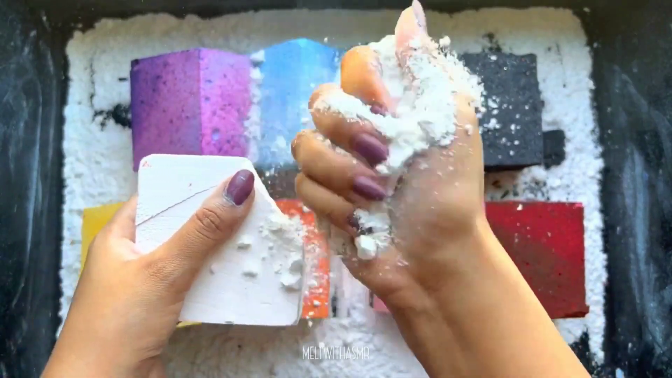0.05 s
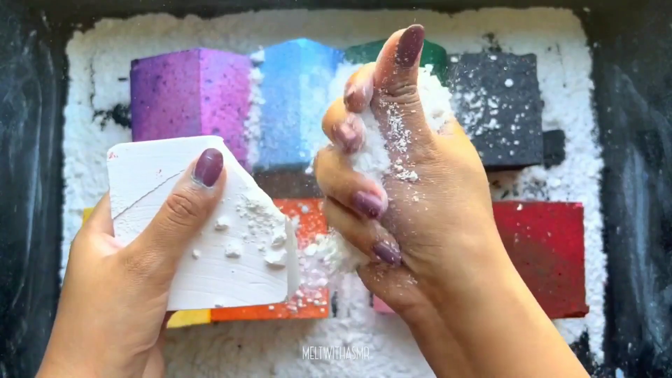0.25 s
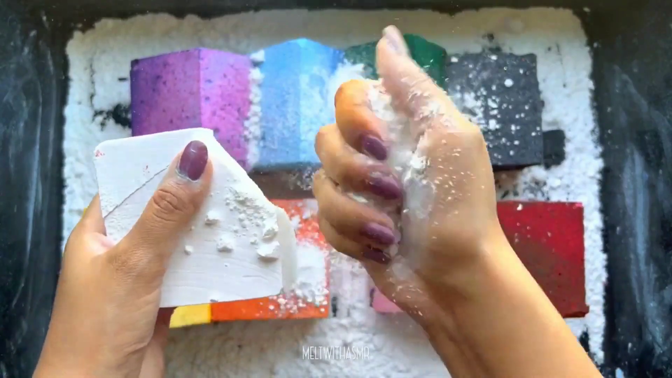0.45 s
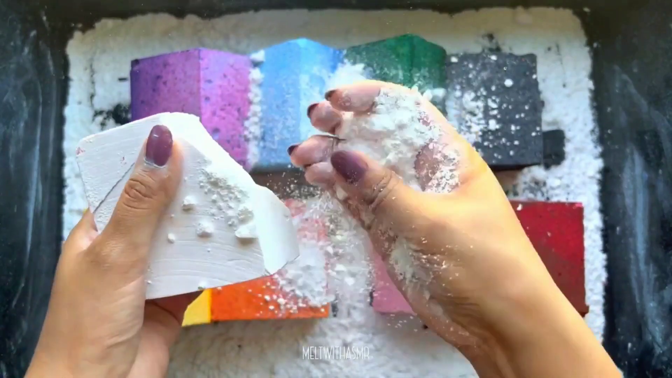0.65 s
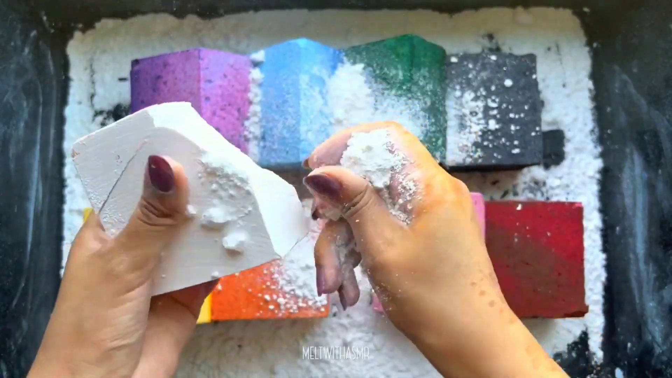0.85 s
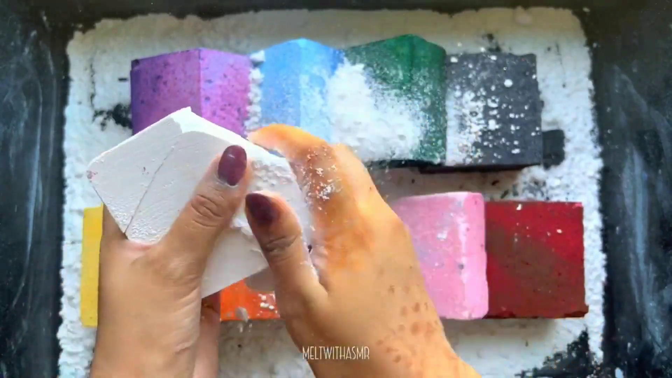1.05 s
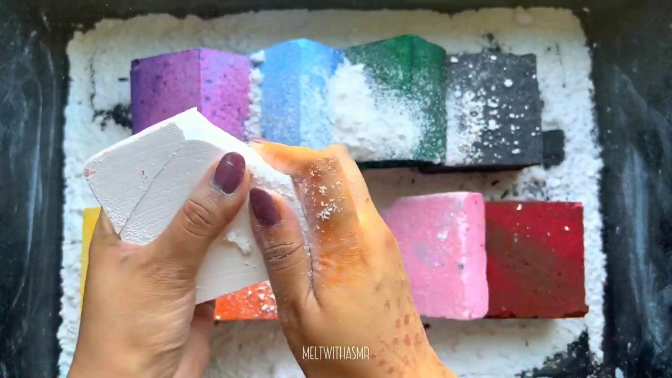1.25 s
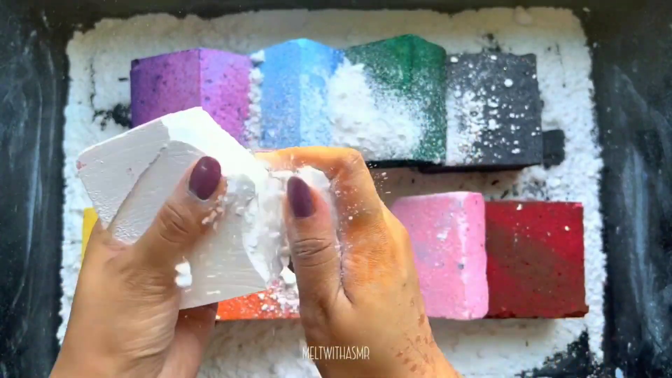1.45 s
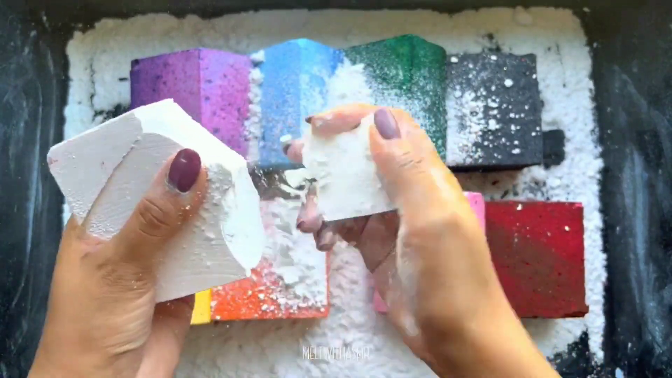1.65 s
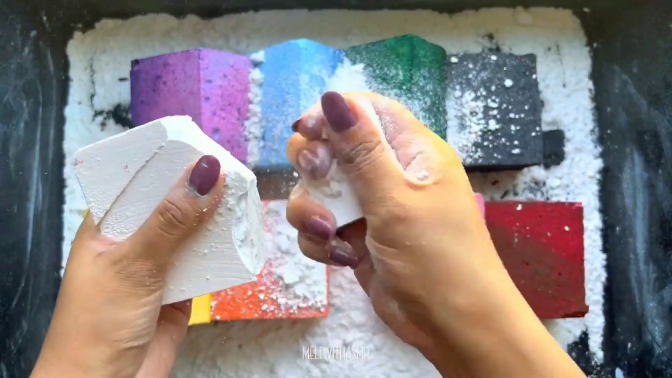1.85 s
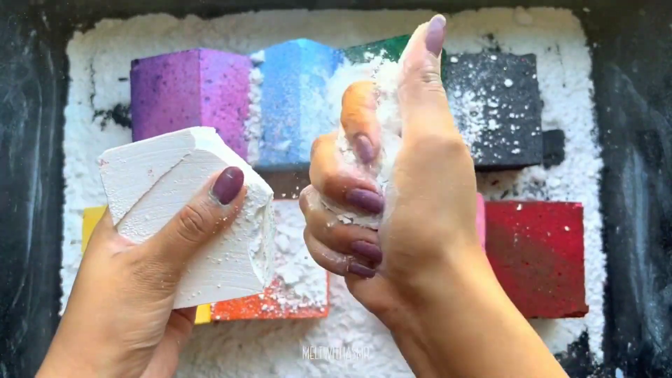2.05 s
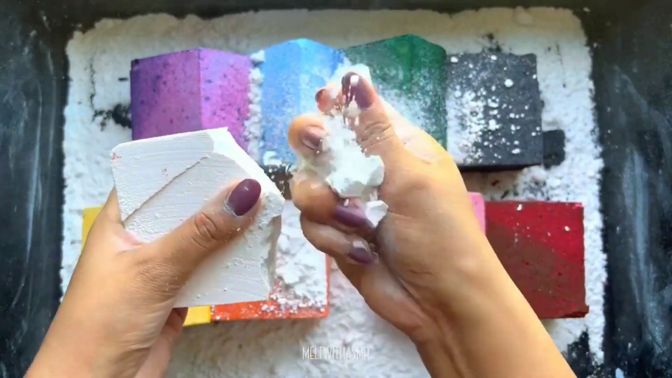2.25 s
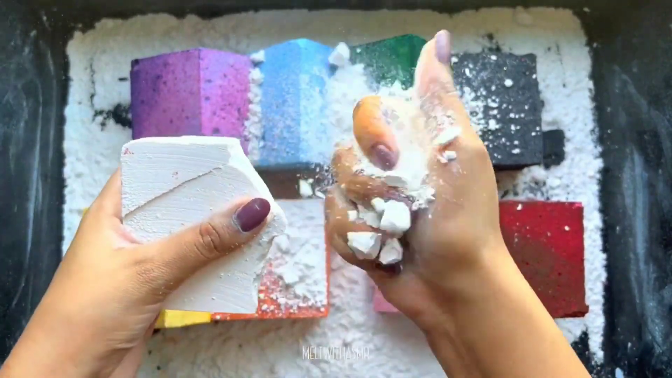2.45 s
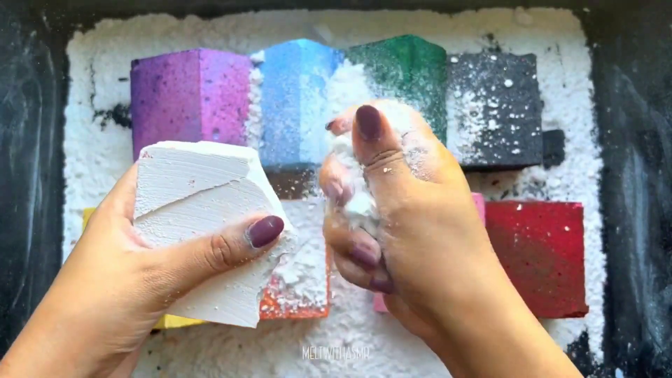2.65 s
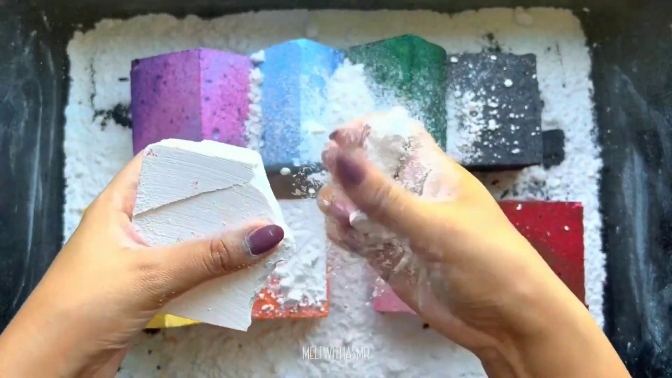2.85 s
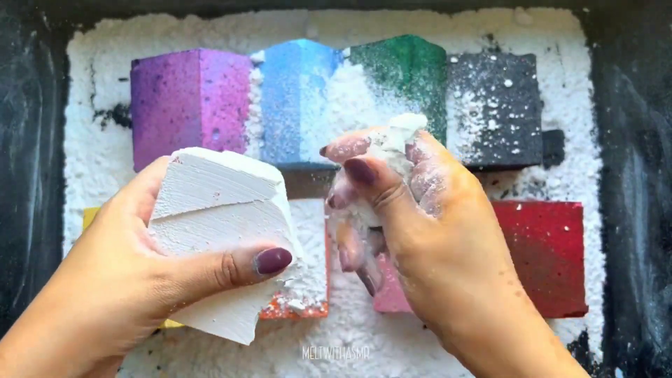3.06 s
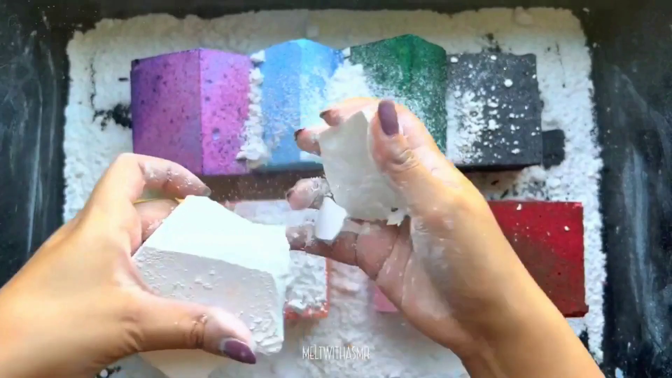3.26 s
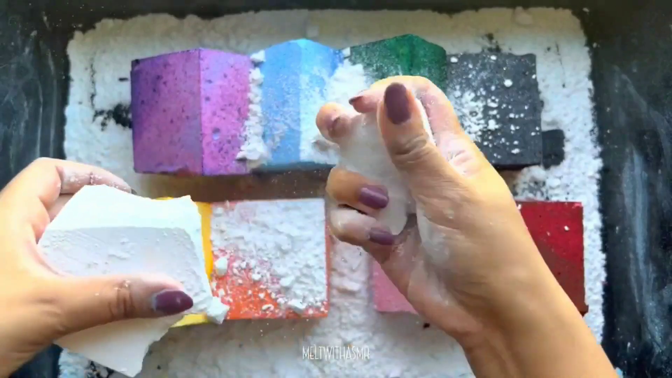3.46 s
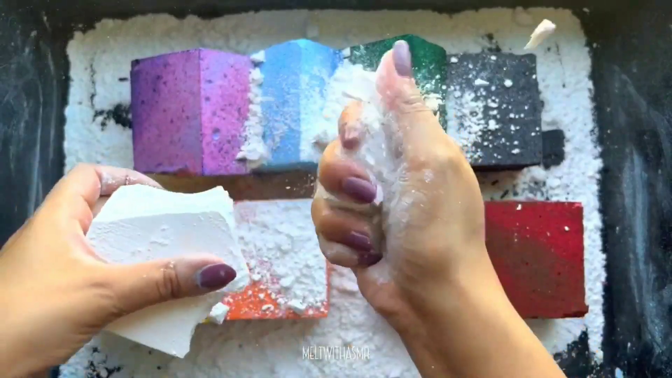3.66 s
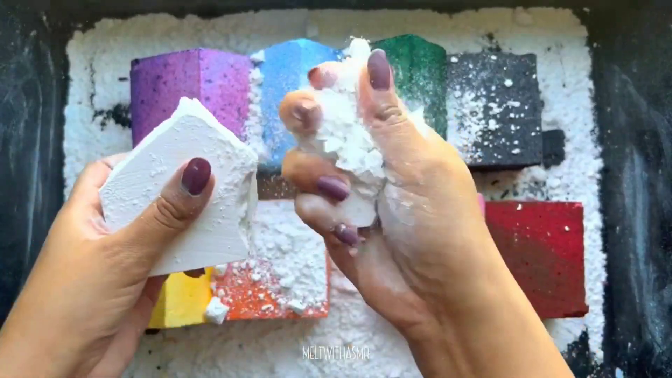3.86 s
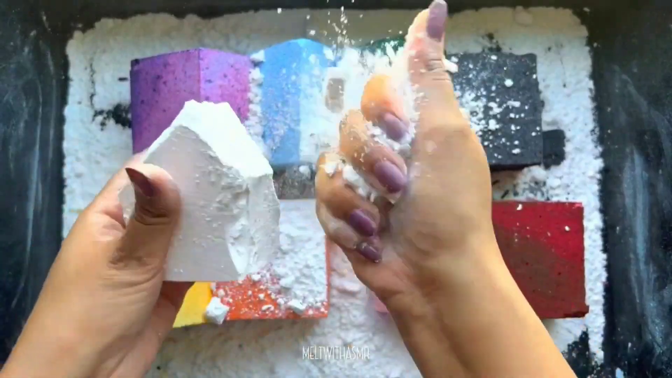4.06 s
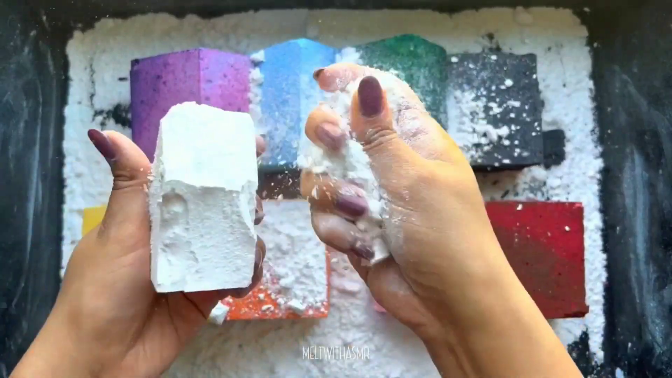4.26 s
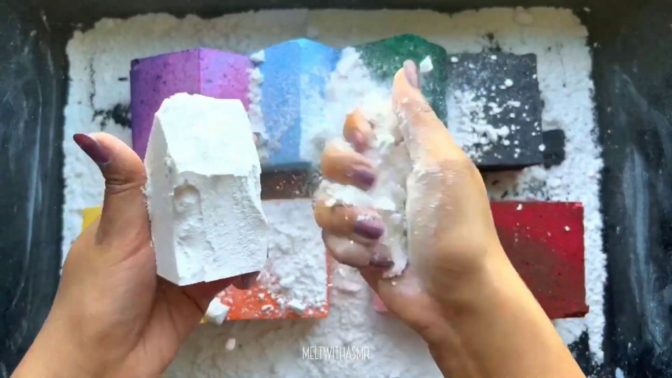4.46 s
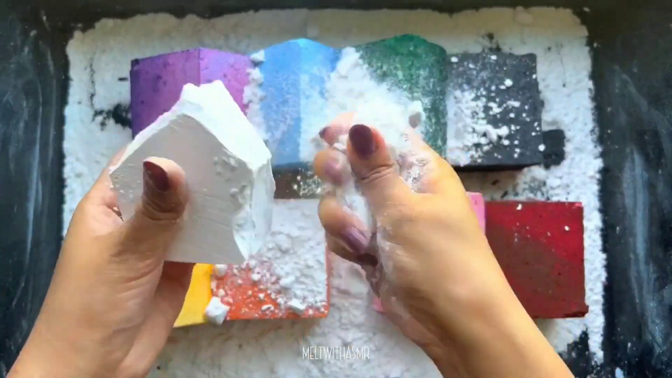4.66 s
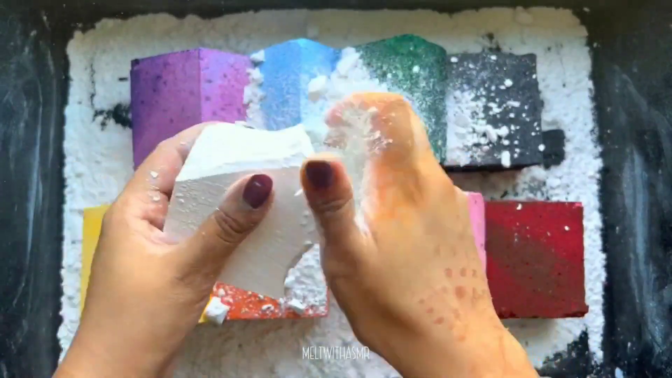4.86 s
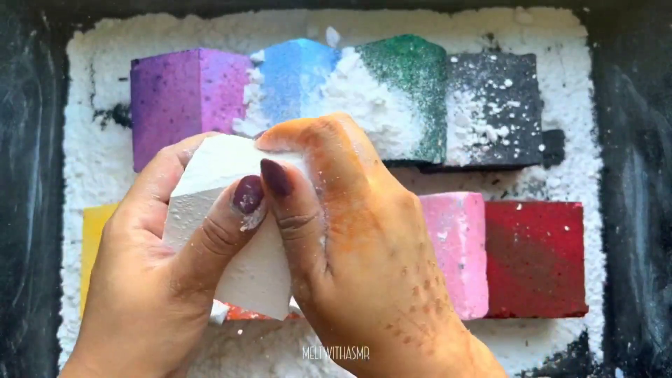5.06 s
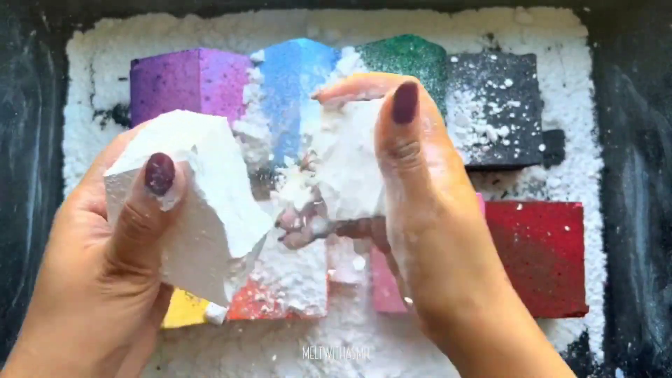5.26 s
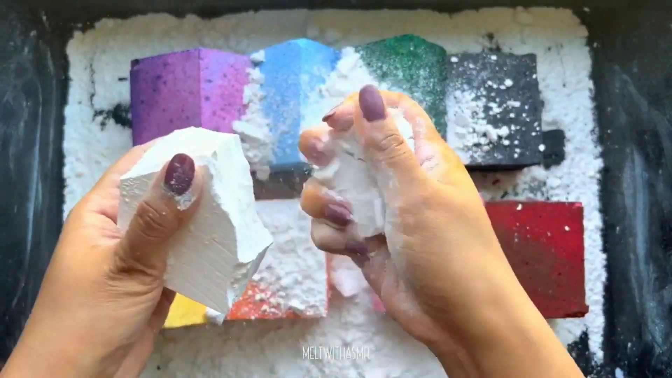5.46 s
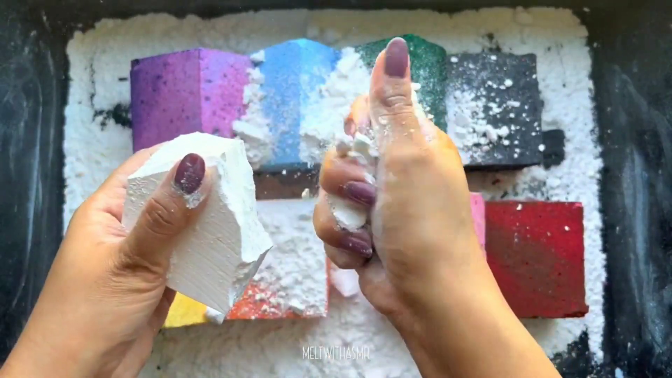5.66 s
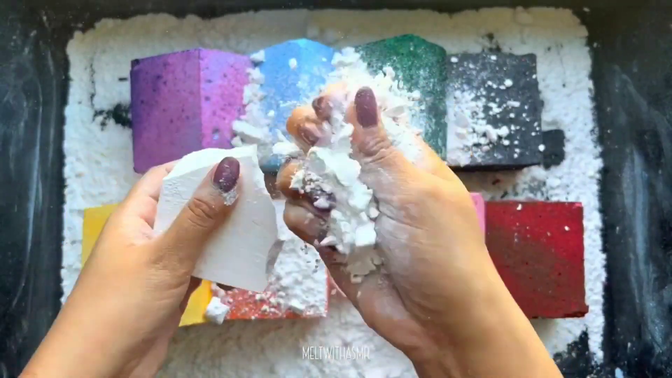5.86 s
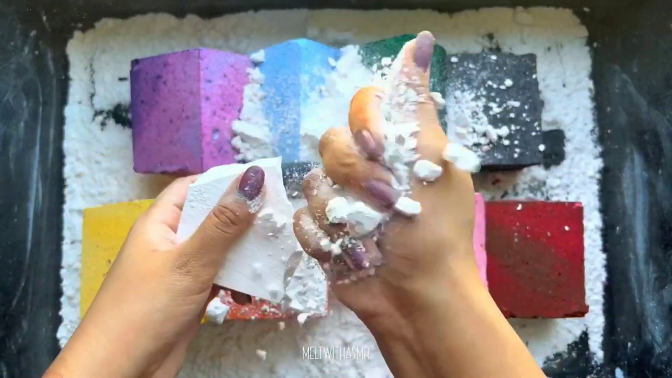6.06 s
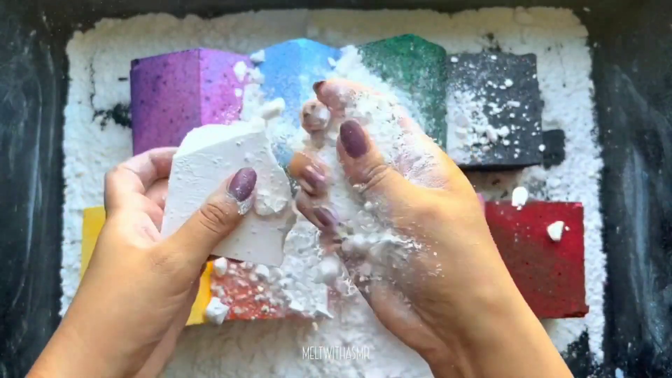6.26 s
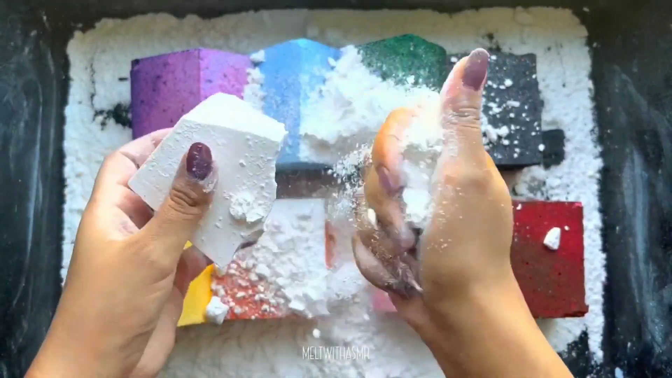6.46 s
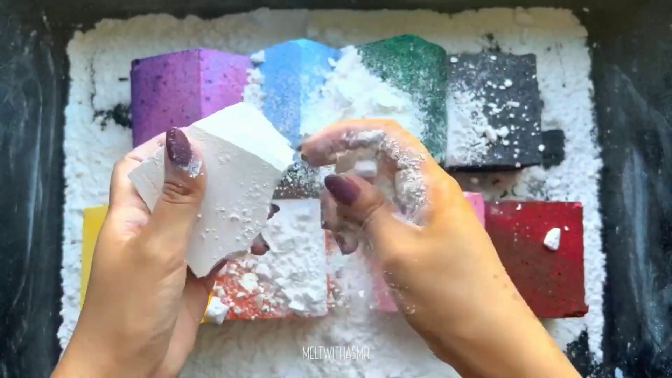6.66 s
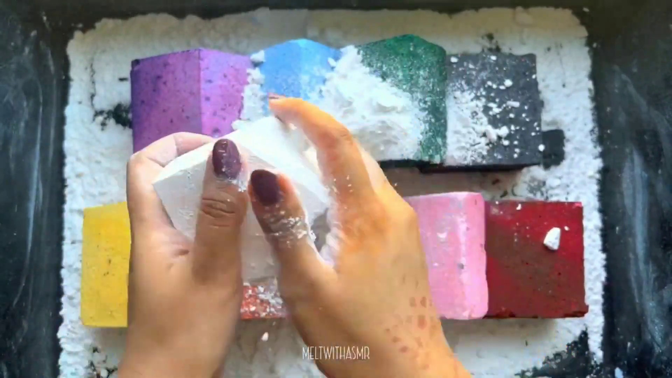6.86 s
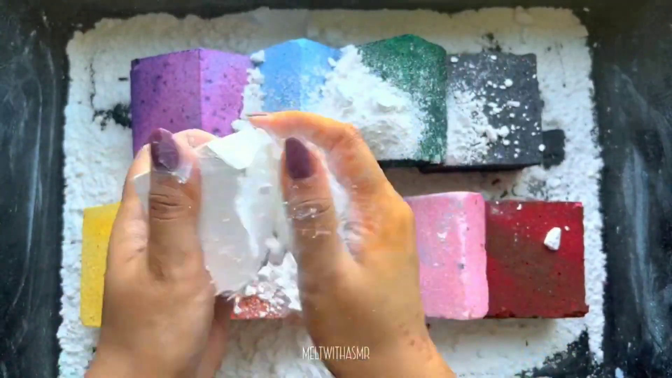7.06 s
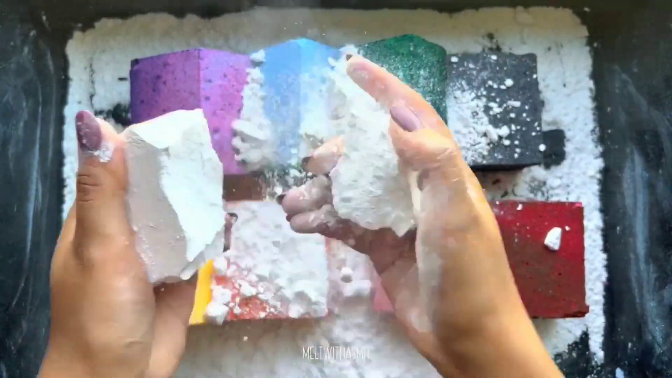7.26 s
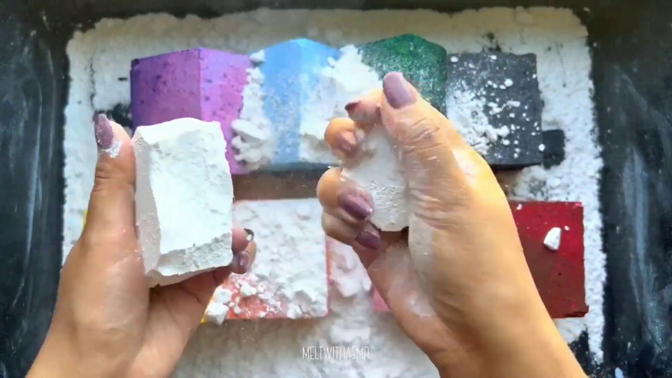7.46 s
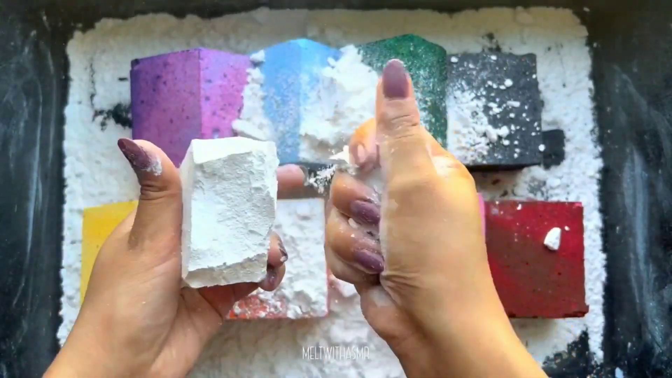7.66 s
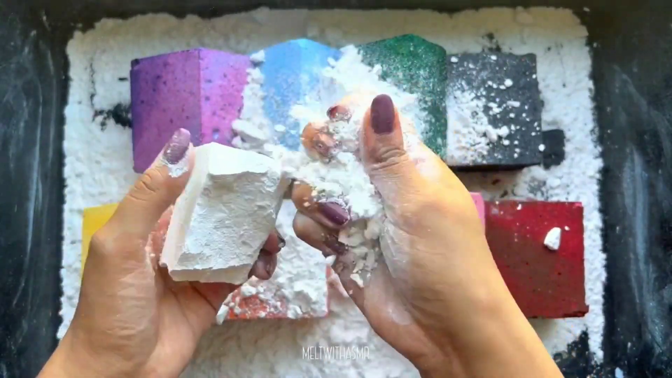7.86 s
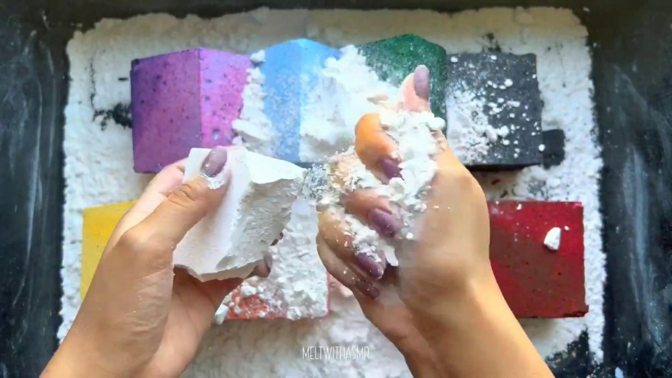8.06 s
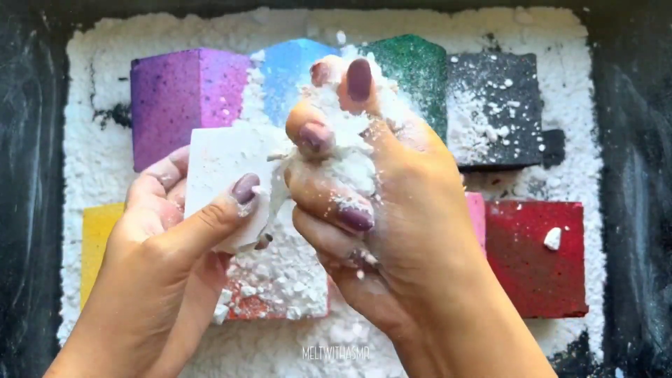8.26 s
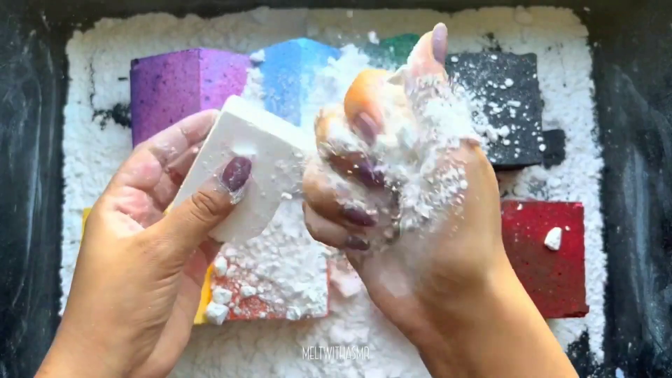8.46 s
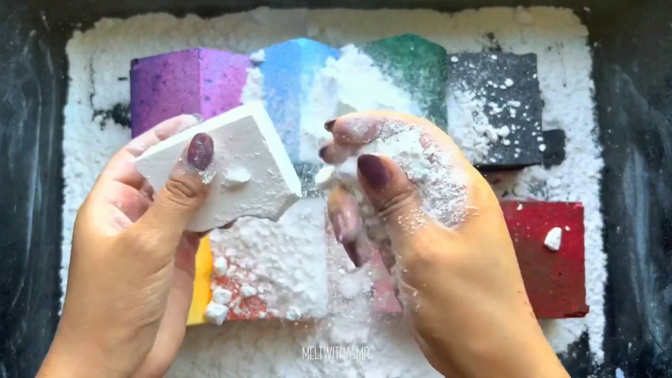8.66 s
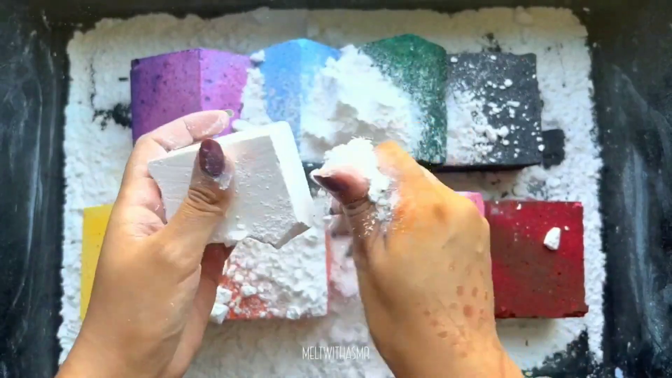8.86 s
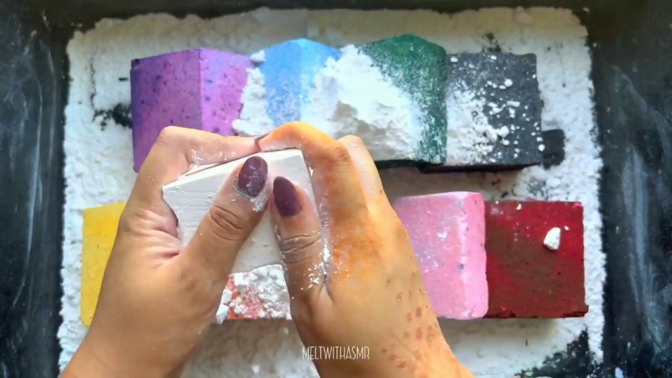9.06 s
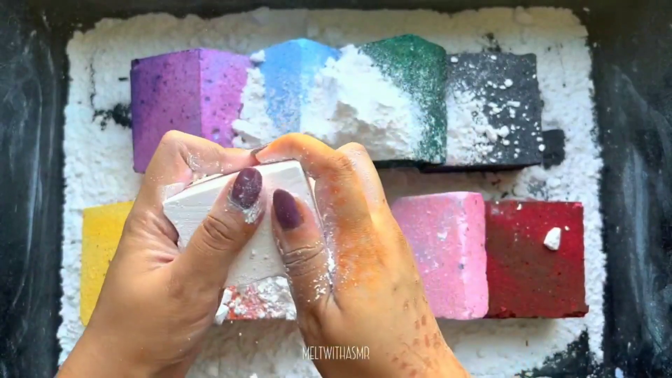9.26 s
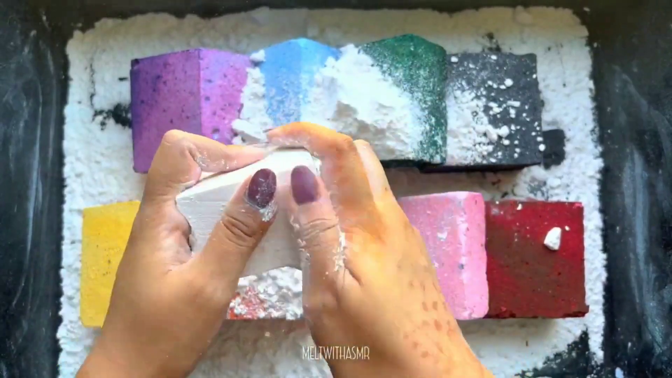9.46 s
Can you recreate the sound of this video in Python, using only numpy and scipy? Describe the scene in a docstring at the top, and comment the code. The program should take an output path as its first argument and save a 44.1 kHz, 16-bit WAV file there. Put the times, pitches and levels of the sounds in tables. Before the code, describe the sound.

Blocks of chalk are broken and ground to powder in a fist, heard close and dry in a small quiet room. Irregular crunches and crisp crackles alternate with sudden woody snaps and dull thuds, coloured by the hollow tub below. The loudest breaks fall around 1.5, 5.2 and 7.2 to 7.6 seconds, then softer crumbling fades into fine grit. A faint low rumble with mains-like hum lies beneath.

```python
"""Chalk grit grinds in a closed fist right by the microphone, over the faint rumble and hum of a small room, while
throughout pieces of gym chalk snap and are crushed: noise bursts through damped modes make the cracks, rings
and thuds; swarms of tiny damped sines and hiss make the grit and powder.
Lumps knock on the blocks in the tub below, whose hollow notes colour every chalk sound; the room answers faintly."""
import sys
import numpy as np
from scipy import signal
from scipy.fft import rfft, irfft, next_fast_len
from scipy.io import wavfile
from scipy.ndimage import uniform_filter1d, map_coordinates

SR = 44100
rng = np.random.default_rng(int(sys.argv[2]) if len(sys.argv) > 2 else 0)


def master(y):
    """Save y as 16-bit WAV."""
    cut = np.clip(np.atleast_2d(y).T, -1, 1)
    pcm = np.round(cut * 32767)  # scale
    wavfile.write(sys.argv[1], SR, pcm.astype(np.int16))


N = 419832
TIME = np.arange(N) / SR
SIZE = 4096  # samples in one short event
EVENT_TIME = np.arange(SIZE) / SR
HZ = np.fft.rfftfreq(SIZE, 1 / SR)
BLOW = 0.005 * SR  # a blow's dB is its energy spread over this many samples
# All chalk levels are those at the source, before the tub and the final mix.


def amp(db):
    """Decibels to gain."""
    return 10 ** (np.asarray(db) / 20)


def unit(x):
    """Scale to rms 1."""
    return x / np.sqrt(np.mean(x ** 2) + 1e-20)


def along(points, hz):
    """(Hz, value) points read on a log frequency axis."""
    f, v = np.transpose(points)
    return np.interp(np.log(hz + 1), np.log(f + 1), v)


def wobble(rate):
    """A smooth random curve, rate knots a second."""
    knots = rng.standard_normal(int(N * rate / SR) + 4)
    return map_coordinates(knots, [TIME * rate])


def colour(x, points):
    """Give a long signal a spectrum."""
    m = next_fast_len(N + SIZE)
    gain = amp(along(points, np.fft.rfftfreq(m, 1 / SR)))
    return irfft(rfft(x, m) * gain, m)[:N]


def causal(points):
    """Minimum-phase response with a spectrum: nothing sounds before the blow."""
    cepstrum = irfft(np.log(amp(along(points, HZ))))
    return np.exp(rfft(cepstrum * (1 + np.sign(np.fft.fftfreq(SIZE)))))


def resonance(hz, q):
    """Response of one damped mode."""
    damping = 1j * HZ * hz / q
    return damping / (hz * hz - HZ ** 2 + damping)


def strike(force, response, db):
    """A short force through a response, at a level."""
    y = irfft(rfft(force, SIZE) * response, SIZE)
    return amp(db) * np.sqrt(BLOW) * y / np.linalg.norm(y)


def add(track, s, sound):
    """Mix a sound in at a time."""
    part = track[round(s * SR):][:len(sound)]
    part += sound[:len(part)]


def tear(length, first, spread_db):
    """Force of a fracture: one break, a dying swarm of smaller ones, then scatter from the hands and the tub."""
    sizes = amp(spread_db * rng.standard_normal(SIZE))
    swarm = rng.standard_normal(SIZE) * sizes * np.exp(-EVENT_TIME / length)
    force = swarm / np.linalg.norm(swarm) + first * (EVENT_TIME == 0)
    scatter = rng.standard_normal(SIZE) * np.exp(-EVENT_TIME / 0.0055)
    return unit(force) + amp(-20.5) * unit(scatter)


# Spectrum of the room's rumble: f/Hz, relative level/dB per Hz
RUMBLE_SPECTRUM = [(8, 8), (45, 1.5), (62, -9.5), (75, -3), (100, -6.5), (120, -7.5), (150, -13.5),
                   (250, -20), (400, -28.5), (1000, -41.5), (15000, -50.5)]
# Hum under the room: f/Hz, peak level/dB
HUM_TONES = [(60, -46), (120, -52)]
# Brief dips of the rumble and hum: t/s, depth/dB
LEVEL_DIPS = [(3.41, 20), (7.04, 7), (9.18, 8)]
RUMBLE_DB, DIP_S = -39.5, 0.088  # steady rms level; half length of a dip


def background():
    """Room tone: noise weighted to the lows, and hum of wavering phase; both dip briefly together."""
    dips_db = sum(depth * np.maximum(1 - abs(TIME - s) / DIP_S, 0) for s, depth in LEVEL_DIPS)
    level_db = RUMBLE_DB - dips_db
    rumble = amp(level_db) * unit(colour(rng.standard_normal(N), RUMBLE_SPECTRUM))
    hum = sum(amp(db) * np.sin(2 * np.pi * hz * TIME + wobble(12)) for hz, db in HUM_TONES)
    return rumble + hum * amp(level_db - np.median(level_db))


# Decay of the small room: f/Hz, time to fall 60 dB/s
ROOM_DECAY = [(200, 0.41), (1800, 0.21), (5000, 0.15), (14000, 0.13)]


def room(x):
    """A diffuse tail; each frequency dies at its own speed."""
    hz, t, z = signal.stft(rng.standard_normal(SR // 2), SR, nperseg=256)
    decay = amp(-60 * t / along(ROOM_DECAY, hz)[:, None])
    tail = signal.istft(z * decay, SR, nperseg=256)[1]
    delayed = np.pad(tail / np.linalg.norm(tail), (SR // 300, 0))  # the answer starts 1/300 s late
    return signal.fftconvolve(x, delayed)[:N]


# Hollow resonances of the tub under the hands: f/Hz, width/Hz, level/dB
TUB_MODES = [(688, 176, -1), (1200, 77, -7.5), (1740, 71, -3), (2650, 140, -11)]


def tub(x):
    """The tub lends its hollow notes, as damped modes, to every sound made above it."""
    m = next_fast_len(N + SIZE)
    f = np.fft.rfftfreq(m, 1 / SR)
    modes = sum(amp(db) * 1j * f * width / (hz * hz - f * f + 1j * f * width)
                for hz, width, db in TUB_MODES)
    return irfft(rfft(x, m) * modes, m)[:N]


# Spectrum of a fracture, shared by all breaking chalk: f/Hz, relative level/dB per Hz
CRACK_SPECTRUM = [(100, -55), (500, 1), (1500, 4.5), (4000, 5), (7500, 5.5), (10000, -1), (12500, -3.5),
                  (15500, -13), (20000, -58)]
# Fractures in the hand, close to the microphone: t/s, crack level/dB, ring level/dB,
# ring of the piece f/Hz, thud level/dB, tearing time scale/s
FRACTURES = [(0.7762, -22.5, -29, 2770, -38.5, 0.00036), (.8589, -34, -38, 8400, -52, 0.00078),
             (1.2879, -53, -37, 2300, -34, 0.0014), (1.3265, -70, -24.5, 1170, -54, 0.0011),
             (1.5399, -13.5, -24.5, 960, -16.5, 0.00027), (1.8418, -35, -27, 6600, -38.5, 0.0006),
             (2.0906, -40, -24.5, 2400, -36.5, 0.001), (2.13, -32, -33, 2290, -37.5, 0.0013),
             (2.2795, -29.5, -36, 2090, -42, 0.0018), (2.319, -27, -34, 4500, -46, 0.00047),
             (2.4087, -20, -15, 2600, -30, 0.00044), (2.776, -29.5, -62, 6100, -48, 0.00025),
             (2.7868, -42, -30, 2460, -39, 0.001), (3.0795, -45, -37.5, 1070, -36.5, 0.00023),
             (3.164, -31.5, -30, 5900, -53, 0.0012), (3.2125, -26, -29, 6000, -39.5, 0.00092),
             (3.5603, -37, -45, 660, -31.5, 0.00056), (3.59, -35, -25, 2920, -37, 0.0016),
             (3.6, -27, -55, 650, -35.5, 0.0013), (3.7272, -29.5, -28.5, 2770, -31, 0.0017),
             (3.8523, -45, -34, 1260, -51, 0.00084), (4.231, -40, -33.5, 1680, -33, .003),
             (4.456, -29, -32, 5530, -54, .00082), (4.766, -31, -29.5, 1930, -34, 0.0011),
             (5.2145, -15.5, -22, 1260, -17.5, 0.00025), (5.218, -22, -21.5, 2900, -27, .0013),
             (5.408, -55, -30.5, 5340, -67, .00043), (5.562, -23.5, -26, 3630, -34, 0.0019),
             (5.722, -31.5, -39.5, 780, -46, 0.0013), (6.133, -27, -28, 1430, -25, 0.00063),
             (6.922, -32.5, -35.5, 1890, -40.5, 0.0037), (7.1652, -16.5, -22.5, 2290, -29, 0.0017),
             (7.167, -29, -25, 11000, -56, 0.0016), (7.368, -61, -41, 3000, -44.5, 0.00027),
             (7.5335, -38, -29, 5800, -47, 0.00083), (7.6172, -51, -15.5, 3140, -26, 0.00017),
             (7.689, -29, -35.5, 1370, -39, 0.0014), (8.8402, -37.5, -24, 2750, -37.5, 0.002)]
# Squeezes of the fist: start of the full grip t/s, hold/s, grinding level/dB, muffled crunch level/dB
FIST_SQUEEZES = [(0, 0.16, -49, -54.5), (0.274, 0.17, -48.5, -55), (0.53, 0.056, -54, -54),
                 (0.702, 0.028, -51.5, -73), (0.941, 0.064, -45.5, -51), (1.07, 0.11, -53.5, -66.5),
                 (1.665, 0.17, -59.5, -67), (1.847, 0.019, -47, -59), (1.966, 0.19, -48, -60.5),
                 (2.242, 0.33, -47.5, -54), (2.633, 0.12, -48.5, -56.5), (2.812, 0.022, -44, -51),
                 (3.044, 0.3, -53.5, -67), (3.47, 0.05, -60.5, -77), (3.559, 0.15, -44, -55.5),
                 (3.863, 0.11, -48, -59.5), (4.03, 0.3, -45, -53), (4.37, 0.15, -48, -58),
                 (4.593, 0.28, -48, -60.5), (4.964, 0.35, -51.5, -56.5), (5.416, 0.035, -46.5, -54),
                 (5.572, 0.098, -49.5, -55), (5.728, 0.52, -47.5, -56.5), (6.1, 0.25, -49.5, -54.5),
                 (6.418, 0.21, -47.5, -55), (6.784, 0.034, -49, -60), (7.315, 0.18, -59, -62),
                 (7.535, 0.34, -49.5, -75), (7.883, 0.28, -49, -58.5), (8.11, 0.19, -49, -60),
                 (8.391, 0.15, -47, -61), (8.701, 0.25, -49.5, -59), (9.057, 0.015, -49.5, -60),
                 (9.278, 0.45, -63.5, -76)]
CLOSE_S, RELAX_S = 0.036, 0.093  # the fingers tighten before the start; decay as they let go
EASE_DB_PER_S = 9.5  # the lump yields while they hold
SHED_DB, SHED_S = -29, 0.084  # grit shed by a fracture, relative to its crack, and its decay
REST_DB, REST_FIST_DB = -86, -68  # powder shifting in the loose hand; the same, muffled


def grip():
    """Grinding and muffled levels in dB: squeezes tighten, hold and relax; each fracture sheds grit."""
    grind, fist = np.full(N, amp(REST_DB) ** 2), np.full(N, amp(REST_FIST_DB) ** 2)
    t = np.arange(SR) / SR
    for s, hold, grind_db, fist_db in FIST_SQUEEZES:
        begin = max(s - CLOSE_S, 0)
        since = t + begin - s
        tighten = np.clip(1 + since / CLOSE_S, 0, 1)
        relax = np.exp(-np.maximum(since - hold, 0) / RELAX_S)
        effort = tighten * amp(-EASE_DB_PER_S * since) * relax
        add(grind, begin, (amp(grind_db) * effort) ** 2)
        add(fist, begin, (amp(fist_db) * effort) ** 2)
    for s, crack_db, *_ in FRACTURES:
        add(grind, s, (amp(crack_db + SHED_DB) * np.exp(-t / SHED_S)) ** 2)
    return 10 * np.log10(grind), 10 * np.log10(fist)


def grains(rate, centre_hz, scatter, cycles, size_db, count):
    """Tiny breaks at random times, each a damped sine of its own pitch and size; rms 1."""
    when, keep, pitch, size, polarity = rng.random((count, 5)).T
    hz = np.clip(centre_hz * (pitch / (1 - pitch)) ** (scatter / 2), 100, SR / 3)
    turns = hz[:, None] * np.arange(120) / SR
    kept = keep < rate * N / SR / count  # thins the candidates to rate breaks a second
    gain = amp(-size_db * np.log(size + 0.0054)) * kept * np.sqrt(hz)
    signed_gain = gain * np.sign(polarity - 0.5)
    waves = signed_gain[:, None] * np.sin(2 * np.pi * turns) * np.exp(-turns / cycles)
    places = (when * N).astype(int)[:, None] + np.arange(turns.shape[1])
    return unit(np.bincount(places.ravel(), waves.ravel(), N)[:N])


def patchy(x, depth_db):
    """Each patch of rubbing grit favours its own pitches for a few hundredths of a second."""
    z = signal.stft(x, nperseg=256)[2]
    field = rng.standard_normal(z.shape)
    narrow = uniform_filter1d(uniform_filter1d(field, size=5, axis=0), size=7, axis=1)
    broad = uniform_filter1d(uniform_filter1d(field[::-1], size=26, axis=0), size=9, axis=1)
    gain = unit(amp(depth_db * unit(unit(narrow) + unit(broad))))
    return signal.istft(z * gain, nperseg=256)[1][:N]


# Spectrum of grit and powder: f/Hz, relative level/dB per Hz
GRIT_SPECTRUM = [(300, -20), (1200, -4.5), (1750, -1.5), (2200, -2.5), (2650, 0), (3300, -1.5), (7300, -4),
                 (9500, -9.5), (12500, -13), (15300, -17), (16500, -40)]
# Spectrum of the crunch inside the fist: f/Hz, relative level/dB per Hz
FIST_SPECTRUM = [(80, -14), (200, 0), (450, -3), (720, -1), (950, -3), (1300, -3), (2000, -14), (5000, -40)]


def crumbling():
    """Grit gives way in small avalanches over the hiss of powder; the fist muffles the coarser part."""
    grind_db, fist_db = grip()
    slips = unit(amp(1.5 * wobble(45) + 2.1 * wobble(220)))
    fine_grains = grains(rate=2200, centre_hz=5620, scatter=0.8, cycles=1.1, size_db=4, count=40000)
    coarse_grains = grains(rate=1100, centre_hz=900, scatter=0.93, cycles=0.42, size_db=4.5, count=12000)
    grit = unit(colour(fine_grains, GRIT_SPECTRUM))
    powder = unit(colour(rng.standard_normal(N), GRIT_SPECTRUM))
    coarse = unit(colour(coarse_grains, FIST_SPECTRUM))
    fine = amp(grind_db) * (amp(-3) * grit + amp(-4.5) * powder)
    muffled = amp(fist_db) * coarse
    return slips * patchy(fine + muffled, depth_db=2.6)


# Spectrum of the flakes' ticks: f/Hz, relative level/dB per Hz
SPLINTER_SPECTRUM = [(600, -19), (6500, -5), (15500, -12)]
SPLINTERS_PER_S = 150
SPLINTER_DB, SPLINTER_SPREAD_DB = -10.5, 10  # rms relative to the grinding; scatter of their sizes


def splinters():
    """Tiny flakes split off with sharp ticks, louder as the fist tightens."""
    grind_db, _ = grip()
    chance, size = rng.random(N), np.clip(rng.standard_normal(N), -2, 2)
    ticks = (chance < SPLINTERS_PER_S / SR) * amp(SPLINTER_SPREAD_DB * size)
    return amp(grind_db + SPLINTER_DB) * unit(colour(ticks, SPLINTER_SPECTRUM))


CRUMB_COUNT = 300  # over the whole scene
POWDER_DB_PER_S = 7  # crumbs fade as a piece is ground down


def crumbs():
    """Crumbs pop at random times and pitches, each a tiny burst of breaks.

    They are louder in a hard squeeze and fainter as the last broken piece turns to powder."""
    out, (grind_db, _) = np.zeros(N), grip()
    chalk = causal(CRACK_SPECTRUM)
    breaks_s = np.array([0] + [row[0] for row in FRACTURES])
    for when, size, pitch, life in rng.random((CRUMB_COUNT, 4)):
        s, hz = when * N / SR, 1100 * 7 ** pitch
        age = s - breaks_s[breaks_s <= s].max()  # since the last fracture, or the start
        db = grind_db[int(when * N)] + 2.5 + 6 * size ** 2 - POWDER_DB_PER_S * age
        force = tear(0.0005 + 0.003 * life, first=0.65, spread_db=7)
        add(out, s, strike(force, resonance(hz, q=2) * chalk, db))
    return out


# Lumps collapsing between the fingers: middle t/s, level/dB, f/Hz, length/s
LUMP_CRUNCHES = [(0.144, -43, 1130, .011), (.284, -40, 3600, 0.018), (0.358, -38.5, 1090, .007),
                 (0.407, -44, 900, 0.008), (0.594, -44, 1710, 0.027), (0.953, -46, 2900, 0.012),
                 (1.553, -37.5, 2500, 0.029), (1.969, -42, 4100, 0.024), (2.487, -40.5, 2000, 0.0074),
                 (2.862, -40, 4800, 0.0071), (4.287, -39.5, 3300, .009), (4.321, -47, 1300, 0.0083),
                 (5.587, -39, 4420, 0.022), (6.303, -40.5, 1920, 0.017), (6.563, -45, 1820, 0.014),
                 (7.051, -46, 4820, 0.0082), (7.387, -46.5, 2030, .016), (7.921, -41, 2200, 0.019),
                 (8.145, -49, 4200, 0.029), (8.215, -46, 2200, 0.022), (8.325, -47, 3400, 0.021),
                 (8.452, -48, 900, 0.024), (8.941, -47, 3500, 0.023), (9.433, -48.5, 3600, 0.0066)]


def crunches():
    """A lump collapses in a short, swelling burst of countless tiny breaks."""
    out = np.zeros(N)
    for s, db, hz, length in LUMP_CRUNCHES:
        age = EVENT_TIME / length
        swell = age ** 0.95 * np.exp(-2.6 * age)
        lumps = amp(3.1 * unit(uniform_filter1d(rng.standard_normal(SIZE), size=70)))
        breaks = rng.standard_normal(SIZE) * amp(4 * rng.standard_normal(SIZE)) * lumps
        response = resonance(hz, q=0.92) * amp(along(CRACK_SPECTRUM, HZ))
        burst = irfft(rfft(breaks * swell / swell.max()) * response)
        add(out, s - 0.52 * length, amp(db) * np.sqrt(length * SR) * burst / np.linalg.norm(burst))
    return out


# Squeaks of chalk on chalk: start t/s, level/dB at the top of the swell, f/Hz, length/s
CHALK_SQUEAKS = [(2.854, -32.5, 5880, 0.0095), (4.2, -38, 3300, 0.027), (4.236, -32, 2530, 0.0063),
                 (7.056, -50, 5480, 0.012), (9.43, -44, 1570, 0.0064)]


def squeaks():
    """Smooth chalk faces stick and slip past each other for an instant: a thin, rough chirp."""
    out = np.zeros(N)
    for s, db, hz, length in CHALK_SQUEAKS:
        drift, rough = (unit(uniform_filter1d(row, size=60)) for row in rng.standard_normal((2, SIZE)))
        turns = np.cumsum(hz * (1 + 0.015 * drift)) / SR
        swell = np.sin(np.pi * np.minimum(EVENT_TIME / length, 1)) * amp(db + 2 * rough)
        add(out, s, swell * np.sin(2 * np.pi * turns))
    return out


# Small corners breaking off close by: t/s, nominal peak level/dB, f/Hz
CORNER_CRACKLES = [(.076, -22, 3020), (0.3816, -19, 3900), (0.7256, -24, 3430), (.8323, -15, 4000),
                   (0.891, -17.5, 1380), (0.9322, -22, 2720), (.94, -17, 1790), (1.863, -25, 3560),
                   (1.876, -20, 4010), (2.048, -26.5, 2910), (2.15, -12.5, 1060), (2.35, -21, 2900),
                   (2.458, -19, 2200), (2.7287, -20.5, 3940), (3.2078, -16, 6170), (3.574, -37, 3870),
                   (3.6298, -14.5, 2650), (3.6796, -16.5, 2660), (3.943, -14.5, 3550), (4.062, -21, 4120),
                   (4.2064, -14.5, 3100), (4.211, -22, 3300), (4.278, -21, 2700), (4.8362, -17.5, 2450),
                   (5.2828, -16.5, 3400), (5.5074, -26.5, 4050), (5.53, -15, 3520), (5.6174, -14, 2650),
                   (5.635, -15, 3600), (5.668, -21, 3800), (5.7482, -15.5, 3800), (6.378, -16, 3580),
                   (6.4228, -13, 5070), (6.516, -21, 3690), (7.546, -15.5, 4270), (7.579, -16.5, 2700),
                   (7.612, -7.5, 3970), (7.6419, -9, 3500), (7.655, -12, 3400), (7.7222, -19, 3520),
                   (7.739, -18, 3880), (8.295, -24.5, 3870), (9.195, -25, 3980), (9.251, -26.5, 4030)]


def crackles():
    """Small corners give way one by one: a brief, dry cluster of breaks around the pitch of the corner."""
    out, chalk = np.zeros(N), causal(CRACK_SPECTRUM)
    for s, peak_db, hz in CORNER_CRACKLES:
        corner = resonance(hz, q=0.88) * chalk
        force = tear(0.0012, first=0.8, spread_db=8)
        add(out, s, strike(force, corner, peak_db - 17.5))  # from peak to blow level
    return out


# Dull knocks of lumps and of the block: t/s, level/dB, f/Hz, sharpness Q
DULL_KNOCKS = [(.502, -27.5, 450, 0.5), (.508, -40, 610, 4.5), (1.288, -25, 210, 1.5),
               (1.325, -22, 540, 1.1), (1.342, -45, 2100, 4), (1.373, -40, 700, 3.3),
               (2.7526, -27.5, 600, 5.6), (3.305, -41.5, 340, 9.4), (3.7276, -33.5, 320, 2.1),
               (3.8524, -30, 660, 2.4), (4.896, -38, 460, 4.8), (5.2147, -29, 655, 0.68),
               (6.1325, -25, 720, 3.5), (7.119, -48, 1330, 1.3), (7.1655, -21.5, 187, 1.8),
               (7.6168, -24, 780, 1.2), (7.986, -40, 1000, 0.98), (8.8405, -37, 900, 1.6)]


def knocks():
    """Soft contacts: a low note that dies within a few cycles, with a little dull scuffing."""
    out = np.zeros(N)
    for s, db, hz, q in DULL_KNOCKS:
        note = resonance(hz, q) * resonance(1.1 * hz, q=0.7) / (1 + 1j * HZ / (4 * hz))
        scuff = resonance(0.6 * hz, q=0.7) ** 2 / (1 + 1j * HZ / (2 * hz))
        add(out, s, strike(tear(0.0013, first=9, spread_db=1), note, db))
        add(out, s, strike(tear(0.004, first=0.56, spread_db=2.5), scuff, db - 8))
    return out


# Large pieces ringing as they knock or come free: t/s, level/dB, lowest f/Hz
LARGE_PIECES = [(.502, -38.5, 900), (1.3253, -23.5, 513), (1.3254, -26, 1340), (4.766, -32, 1970),
                (5.2171, -32.5, 1040), (6.133, -35.5, 1800), (7.1659, -18, 1394), (8.8412, -31.5, 1220)]
# Modes of a large piece: ratio to the lowest f, relative level/dB
PIECE_MODES = [(1, 7.5), (1.44, 4.5), (2.2, -28)]


def slabs():
    """A large piece rings in a few hollow modes for some milliseconds."""
    out = np.zeros(N)
    for s, db, hz in LARGE_PIECES:
        modes = sum(amp(level) * resonance(ratio * hz, q=13.7) for ratio, level in PIECE_MODES)
        force = tear(0.002, first=2.5, spread_db=2)
        add(out, s, strike(force, modes * resonance(1.2 * hz, q=1), db))
    return out


def snaps():
    """A fracture cracks, rings the piece for a few cycles, thuds into the hand."""
    cracks, rings, bright = np.zeros(N), np.zeros(N), causal(CRACK_SPECTRUM)
    hand = resonance(240, q=0.21) ** 2
    for s, crack_db, ring_db, ring_hz, thud_db, length in FRACTURES:
        sudden = 0.00071 / length  # a quick fracture spends most of its force in the first break
        piece = resonance(ring_hz, q=1.5) * resonance(ring_hz, q=0.9) / (1 + 1j * HZ / (3 * ring_hz))
        lead_in_force = tear(0.0033, first=0, spread_db=3)
        crack_force = tear(2.85 * length, first=sudden, spread_db=2.0)
        ring_force = tear(1.94 * length, first=0.79 * sudden, spread_db=-3.5)
        thud_force = tear(9.1 * length, first=2.6, spread_db=20.0)
        add(cracks, s - 0.0025, strike(lead_in_force, bright, crack_db - 26))  # nearly inaudible
        add(cracks, s, strike(crack_force, bright, crack_db))
        add(rings, s, strike(ring_force, piece, ring_db))
        add(rings, s, strike(thud_force, hand, thud_db))
    return cracks, rings


def scene():
    """Chalk, tub, room answer and room tone; the hands shield the ringing pieces from the room."""
    cracks, rings = snaps()
    crisp = cracks + crackles() + squeaks() + crunches() + crumbs() + splinters() + crumbling()
    thumps = knocks() + slabs()
    chalk = crisp + rings + thumps
    near = amp(-2.0) * (chalk + tub(chalk))
    escaping = crisp + amp(-5.5) * rings + amp(-1) * thumps
    return (near + amp(-19.5) * room(escaping) + background())[None]


PEAK = 0.8  # full scale 1; peaks round off towards this
SILENCE_START_S, SILENCE_END_S = 4.945, 4.9675
TOP_HZ = 15750  # middle of a 500 Hz wide slope


def record(dry):
    """The sharpest peaks round off, the sound drops out for an instant, and the top of the band is cut."""
    rounded = dry / (1 + (dry / PEAK) ** 6) ** (1 / 6)
    sounding = (TIME < SILENCE_START_S) | (TIME > SILENCE_END_S)
    live = uniform_filter1d(1.0 * sounding, size=24)  # softens the edges of the gap
    passed = np.clip(0.5 + (TOP_HZ - np.fft.rfftfreq(N, 1 / SR)) / 500, 0, 1)
    return irfft(rfft(rounded * live) * passed, N)


dry = scene()
out = record(dry)
master(out)
```